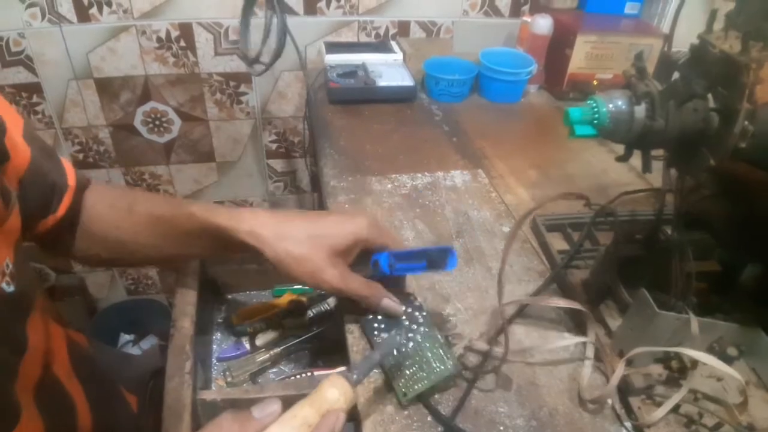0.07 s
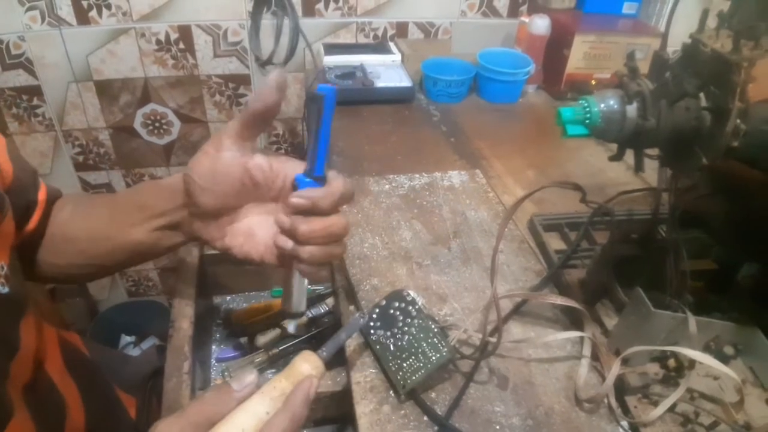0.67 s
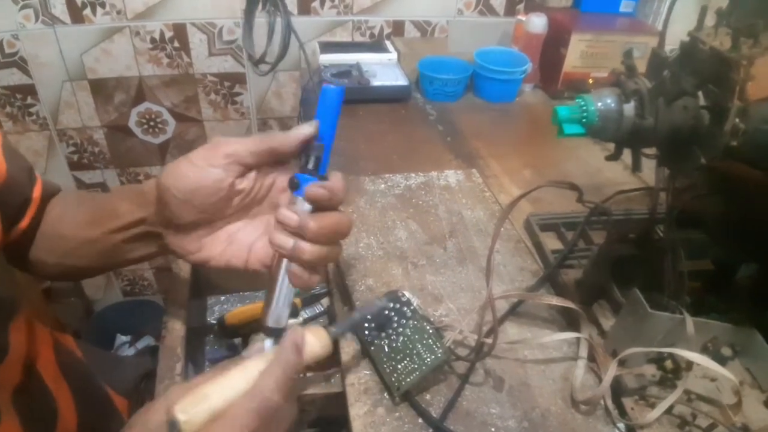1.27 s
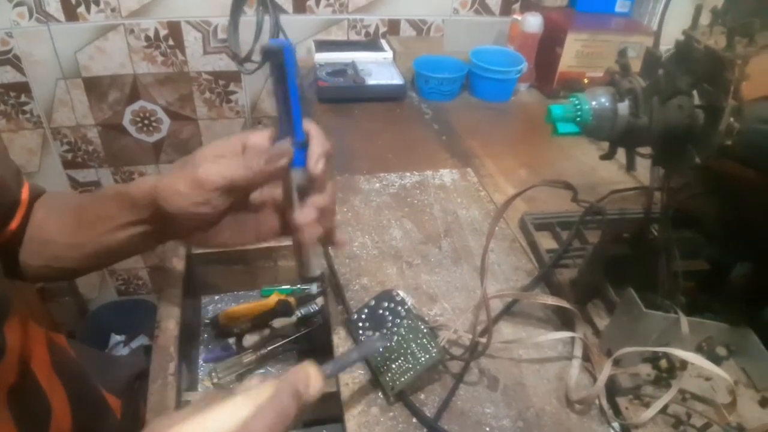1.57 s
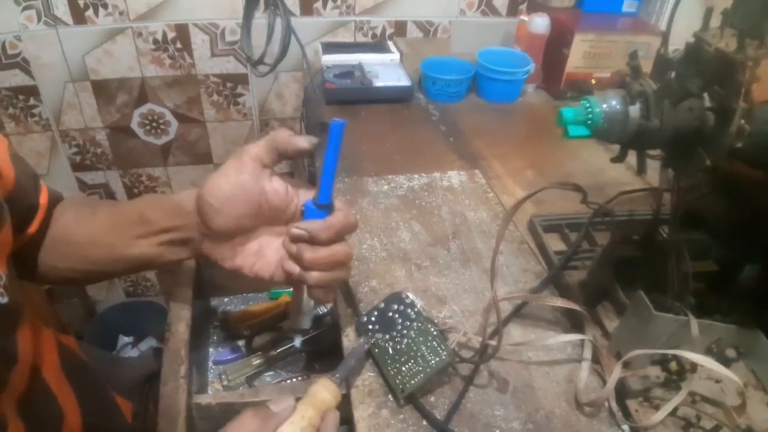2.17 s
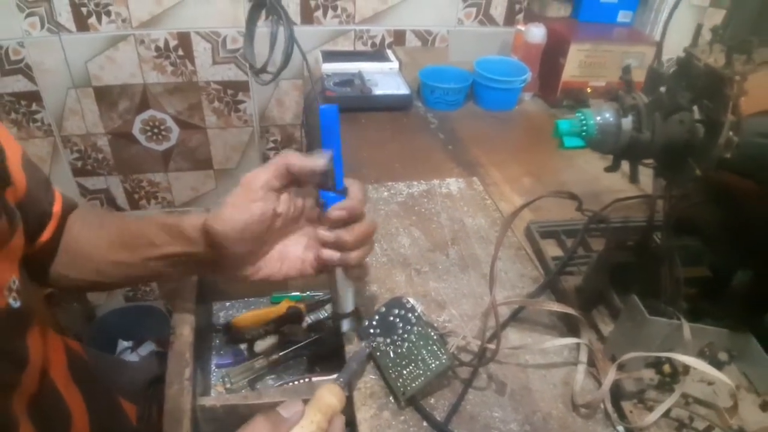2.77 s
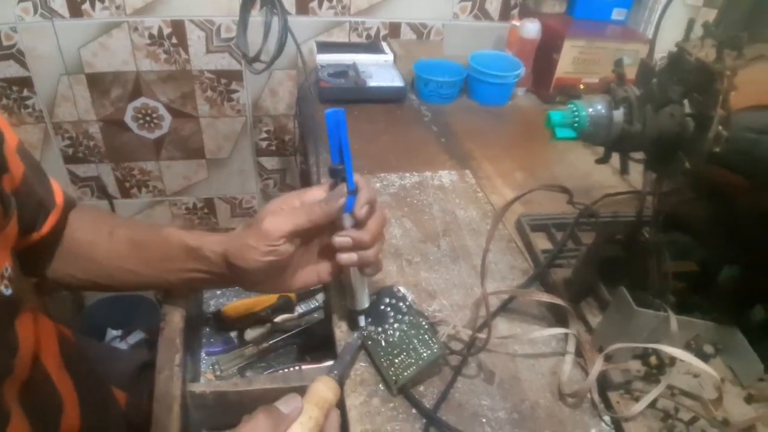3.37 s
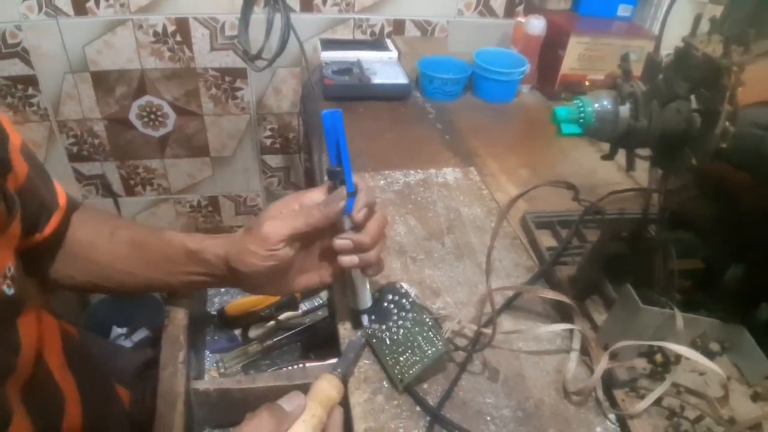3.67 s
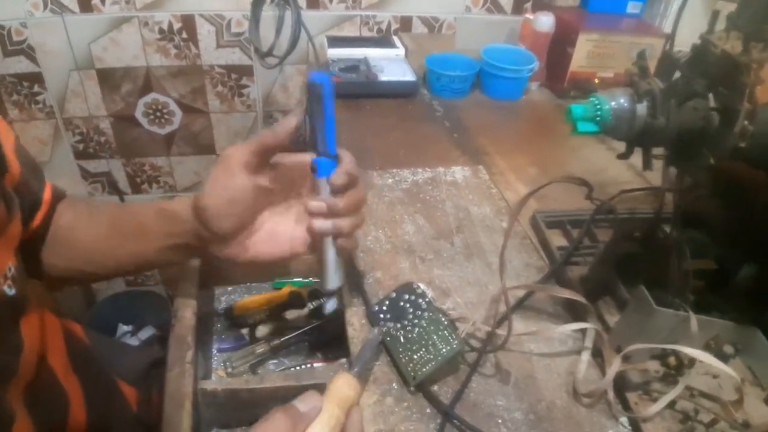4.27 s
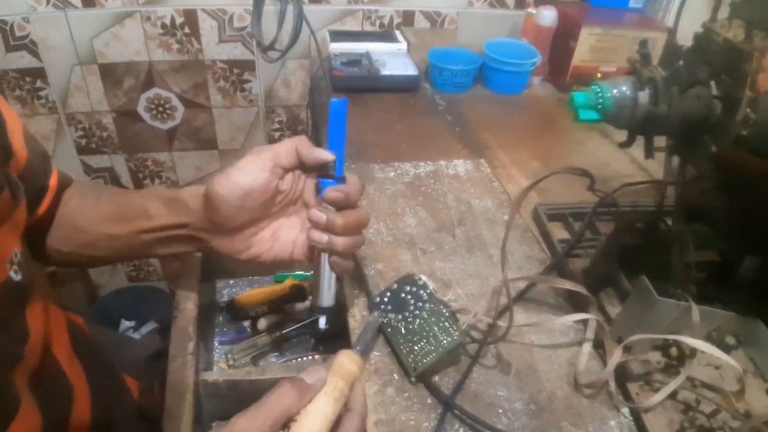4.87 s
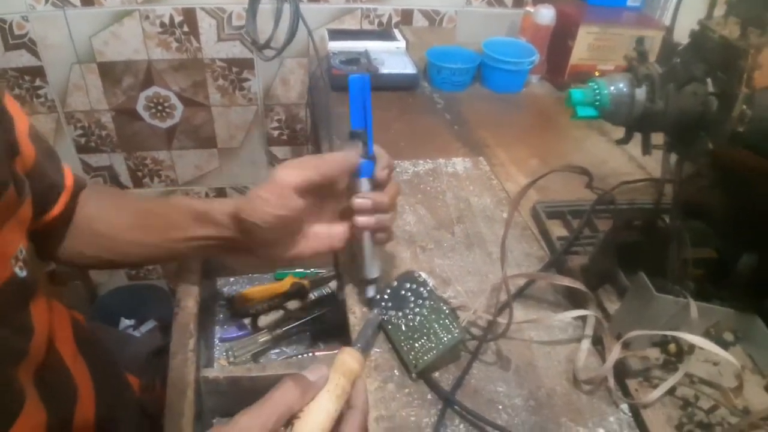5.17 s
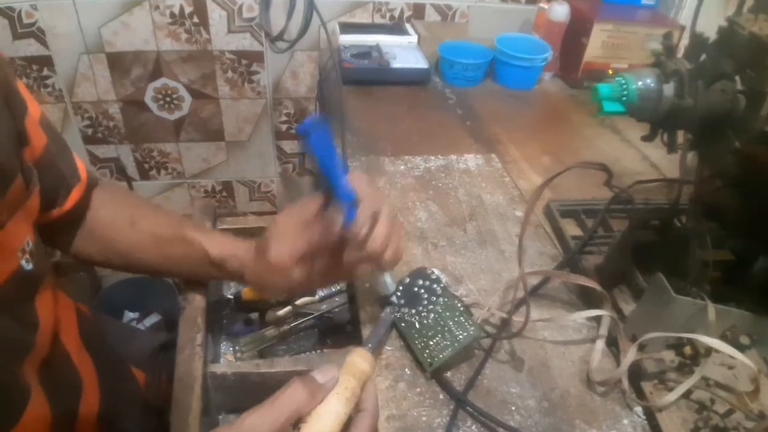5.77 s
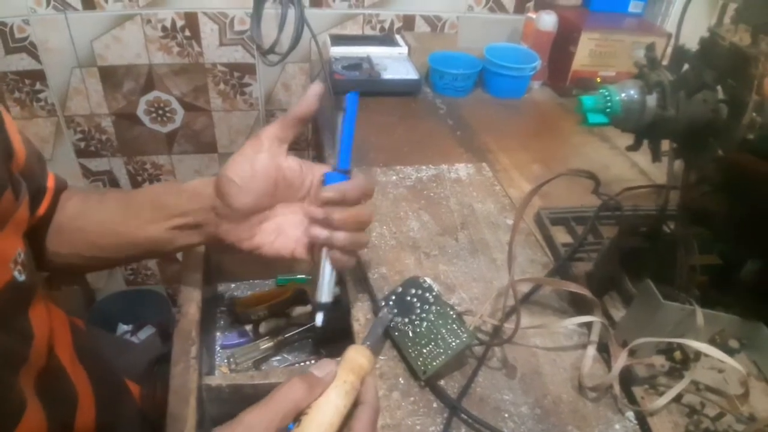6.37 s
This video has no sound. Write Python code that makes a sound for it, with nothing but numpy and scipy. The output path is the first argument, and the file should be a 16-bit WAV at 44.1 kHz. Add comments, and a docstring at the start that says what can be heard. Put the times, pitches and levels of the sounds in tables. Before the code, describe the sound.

A spring-loaded desoldering pump is worked close to a phone microphone in a small tiled workshop. Soft hand knocks come first, then the plunger slides down with a faint squeak and latches with a hard plastic clack. The slider taps back, and after a pause the trigger snaps and the spring rings briefly. It fires three times in all, each with a short bright echo, and a fresh stroke squeaks at the end.

```python
"""A spring-loaded desoldering pump is worked over a circuit board in a small tiled workshop, near a phone.
Hands knock and rustle over a faint hum, which stops as the plunger first slides down on its squeaking
seal. It latches with a hard plastic clack, the slider runs back and the hand holds still to aim.
The trigger snaps; the piston rushes up the barrel, hits its stop and leaves the spring ringing.
The pump fires near 1.5, 3.9 and 5.8 s, and a fresh stroke is just squeaking at the end."""
import sys
import numpy as np
from scipy import signal
from scipy.fft import rfft, irfft, next_fast_len
from scipy.io import wavfile
from scipy.ndimage import uniform_filter1d

SR = 44100
rng = np.random.default_rng(int(sys.argv[2]) if len(sys.argv) > 2 else 0)


def wav_record(signal):
    """Record a signal, one row per channel, as 16-bit PCM in the file named by sys.argv[1]."""
    frames = np.transpose(np.atleast_2d(signal))
    bounded = np.clip(frames, -1, 1)
    # unit amplitude maps onto the largest positive 16-bit level
    quanta = np.round(bounded * 32767).astype(np.int16)
    wavfile.write(sys.argv[1], SR, quanta)


N = 287524
T = np.arange(N) / SR
BLOW_SIZE = 8192
BLOW_HZ = np.fft.rfftfreq(BLOW_SIZE, 1 / SR)

# plunger strokes: start_s, end_s, thumb_db, rub_db, squeak_s, swell_s, low_squeak_db, high_squeak_db
STROKES = [(0.794, .981, -47, -47, .83, 0.0073, -49, -58.5),
           (2.0688, 2.125, -54, -66, 2.1, 0.0073, -84, -90),
           (2.414, 2.561, -58, -50, 2.482, 0.025, -52, -53),
           (4.591, 4.76, -51, -47, 4.616, .008, -38, -67.5),
           (6.4621, 6.63, -49, -43, 6.505, 0.01, -36.5, -51)]
# latch clacks: start_s, level_db, tilt_db_per_octave, t60_s, barrel_hz, barrel_db
LATCHES = [(0.9846, -8.5, -0.07, 0.0065, 3600, 5.5), (2.1344, -17.5, -3, 0.015, 2750, 9.5),
           (2.5696, -9.5, 0, .014, 7300, 5.5), (4.7728, -9, -0.23, .014, 2400, 2.5)]
# the slider hitting its stop: start_s, level_db, body_db, treble_db
RETURNS = [(1.2591, -27, 6.5, 0), (2.774, -31, -4.5, -5.5), (4.9936, -28.5, -6, -11.5)]
# trigger snaps: start_s, level_db, treble_db, t60_s
TRIGGERS = [(1.4472, -28, 19, 0.035), (3.914, -19.5, -1, 0.02), (5.771, -40.5, -0.5, 0.074)]
# piston shots: fastest_s, swell_s, rush_db, ring_db, ring_tilt_db_per_octave, even_modes_db
FIRINGS = [(1.459, 0.0064, -30.5, -34, -22.5, 10), (3.928, 0.0049, -28.5, -20.5, 2, -1.5),
           (5.807, 0.0089, -32, -33.5, 6.5, -9.5)]
# spectra of knocked plastic, rubbed plastic and the moving hand: frequency_hz, level_db
KNOCK_COLOUR = [(30, -39.5), (75, -22), (150, -6), (290, 0), (600, -2.5), (1200, -4.5), (2000, -2),
                (3000, 1.5), (4500, 2), (8000, -12), (16000, -11.5)]
RUB_COLOUR = [(100, -6), (300, 0.5), (700, -3.5), (1400, -6), (2500, -0.5), (4000, 5), (5500, -0.5),
              (8000, -3.5), (11000, -5.5), (16000, -11)]
HANDLING_COLOUR = [(40, -20.5), (90, -0.5), (160, 5.5), (280, -3), (450, -15.5), (1000, -24), (3000, -23.5),
                   (8000, -40), (16000, -41.5)]


def undb(db):
    """Decibels to gain."""
    return 10 ** (np.asarray(db) / 20)


def unit(x):
    """Scale to rms 1."""
    return x / np.sqrt(np.mean(x ** 2))


def gains(points, hz):
    """Gain at hz of (frequency_hz, level_db) points joined on a log axis."""
    f, db = np.transpose(points)
    return undb(np.interp(np.log(hz + 1), np.log(f), db))


def tint(x, points):
    """Give a sound the colour of (frequency_hz, level_db) points, rms 1."""
    size = next_fast_len(N, real=True)
    spectrum = rfft(x, size) * gains(points, np.fft.rfftfreq(size, 1 / SR))
    return unit(irfft(spectrum, size)[:N])


def noise(points):
    """Noise of a given colour, rms 1."""
    return tint(rng.standard_normal(N), points)


def walk(rate):
    """A random wander with a spread near 1 and `rate` turns a second."""
    knots = rng.standard_normal(int(N / SR * rate) + 2)
    return np.interp(T * rate, np.arange(len(knots)), knots)


def fade(t, t60):
    """Exponential decay."""
    return np.exp(-np.log(1000) * t / t60)


def swell(s, width):
    """A bell-shaped rise and fall around time s."""
    bell, near = np.zeros(N), abs(T - s) < 10 * width
    bell[near] = np.exp(-((T[near] - s) / width) ** 2 / 2)
    return bell


def add(track, s, sound):
    """Mix a sound in at time s."""
    i = max(int(s * SR), 0)
    track[i:i + len(sound)] += sound[:N - i]


def resonate(x, hz, t60):
    """One damped mode, with unit gain for noise power."""
    t = T[:int(t60 * SR)]
    ring = fade(t, t60) * np.sin(2 * np.pi * hz * t)
    return signal.oaconvolve(x, ring / np.linalg.norm(ring))[:N]


def hump(hz, db, octaves=0.23):
    """Gain of one broad resonance."""
    return undb(db / (1 + (np.log2((BLOW_HZ + 1) / hz) / octaves) ** 2))


def blow(colour, t60, energy_s=.005):
    """A burst of dense, quickly damped plastic modes, with the energy of rms 1 held for energy_s."""
    cepstrum = irfft(np.log(colour))  # folded to minimum phase, so the attack stays sharp
    cepstrum[1:BLOW_SIZE // 2] *= 2
    cepstrum[BLOW_SIZE // 2:] = 0
    decay = fade(T[:BLOW_SIZE], 2 * t60)
    burst = rfft(rng.standard_normal(BLOW_SIZE) * decay)
    flat = irfft(burst / abs(burst)) * decay  # a hard contact feeds all frequencies alike
    hit = irfft(rfft(flat) * np.exp(rfft(cepstrum)))
    return hit / np.linalg.norm(hit) * np.sqrt(energy_s * SR)


def strike(db, body_db, treble_db, t60, hz, body_hz=1100, treble_hz=4800):
    """Heavy contacts carry more body, hard ones more treble; the place struck picks the resonance."""
    low = 1 / (1 + (BLOW_HZ / body_hz) ** 2)
    high = 1 - 1 / (1 + (BLOW_HZ / treble_hz) ** 4)
    colour = gains(KNOCK_COLOUR, BLOW_HZ) * undb(body_db * low + treble_db * high) * hump(hz, db=8)
    return undb(db) * blow(colour, t60)


def echo(build_s=0.0022, shared_hz=500, patchy_db=3):
    """The short, bright, dense stereo echo of tiles and bench for one place of the pump."""
    # reverb bands: centre_hz, t60_s, level_db
    bands = [(100, .45, -6.5), (300, 0.64, -1.5), (750, 0.28, 2.5), (1940, 0.31, -3), (3480, 0.34, -8),
             (7100, 0.33, 2.5), (11000, 0.31, -1.5), (16000, 0.16, -3.5)]
    t = T[:SR * 2 // 3]
    hz = np.fft.rfftfreq(len(t), 1 / SR)
    centres = np.log([row[0] for row in bands])
    common, *own = rfft(rng.standard_normal((3, len(t))) * undb(patchy_db * walk(1500)[:len(t)]))
    alike = 1 / (1 + (hz / shared_hz) ** 2)  # long waves reach both microphones in step
    field = np.sqrt(alike) * common + np.sqrt(1 - alike) * np.array(own)
    out = 0
    for share, (_, t60, db) in zip(np.eye(len(bands)), bands):
        envelope = fade(t, t60) * (1 - np.exp(-(t / build_s) ** 2))
        band = irfft(field * np.interp(np.log(hz + 1), centres, share), len(t))
        out = out + undb(db) * band * envelope / np.linalg.norm(envelope)
    return out


def workshop(x, shadow_hz=450, pan_db=9, lag_s=.00011, send_db=-1.27, lowered_db=-2, places=12):
    """The pump is heard from the left; its echo shifts as it moves and dries up down at the board."""
    bass = signal.sosfilt(signal.butter(1, shadow_hz, fs=SR, output="sos"), x)  # bends round the phone
    left, right = (bass + (x - bass) * undb(side * pan_db / 2) for side in (1, -1))
    out = np.array([left, np.pad(right, (round(lag_s * SR), 0))[:N]])
    lowered = sum(swell(s, .25) for s, *_ in FIRINGS)
    send = x * undb(send_db + lowered_db * lowered)
    for place in np.eye(places):
        share = np.sqrt(np.interp(T, np.linspace(0, T[-1], places), place))
        near = np.flatnonzero(share)
        for channel, response in zip(out, echo()):
            add(channel, T[near[0]], signal.fftconvolve((send * share)[near], response))
    return out


def handling_level(moving_db=-68, still_db=-77.5, settle_s=.15, regrip_db=-69.5, regrip_lag_s=.25):
    """The thumb shifts after each latching; the hand holds still from slider return to firing."""
    aiming = sum((T > back[0]) & (T < shot[0]) for back, shot in zip(RETURNS, FIRINGS))
    moving = 1 - uniform_filter1d(aiming.astype(float), int(settle_s * SR))
    first_latch_db = LATCHES[0][1]
    regrip = sum(swell(s + regrip_lag_s, .18) * undb(db - first_latch_db) for s, db, *_ in LATCHES)
    return undb(still_db + (moving_db - still_db) * moving) + undb(regrip_db) * regrip


def background(air_db=-76.5, rumble_db=-80.5, jolt_db=-40.5, side_db=-8,
               hum_hz=48.1, hum_db=-72.5, hum_end_s=.93):
    """Faint hiss, soft hand and sleeve, a rumble as each firing jolts the arm, and a hum that stops."""
    # spectra of room tone and low rumble: frequency_hz, level_db
    air_colour = [(59, -42), (100, -13.5), (202, -16), (373, -36), (442, -16.5), (721, -25), (1100, -29.5),
                  (2690, -31), (16000, -30.5)]
    rumble_colour = [(20, -13), (35, -9), (48, -1.5), (70, -5.5), (140, -20), (400, -61.5)]
    out = np.array([noise(air_colour), noise(air_colour)]) * undb(air_db)
    rumble = undb(rumble_db) + sum(undb(db + jolt_db) * swell(s, .076) for s, _, db, *_ in FIRINGS)
    for level, colour in (handling_level(), HANDLING_COLOUR), (rumble, rumble_colour):
        waver = undb(.5 * walk(30))
        mid, side = noise(colour), undb(side_db) * noise(colour)
        out += level * waver * np.array([mid + side, mid - side])
    hum_gate = np.clip((hum_end_s - T) / .15, 0, 1)
    return out + undb(hum_db) * hum_gate * np.sin(2 * np.pi * hum_hz * T)


def hand(recoil_db=-20, recoil_s=.01):
    """Dull bumps, recoil and thuds of hand and arm, and skin squeaking on the plastic."""
    # soft bumps: peak_s, swell_s, level_db
    bumps = [(0.054, 0.045, -50.5), (.15, 0.024, -54), (.28, 0.0049, -48), (2.25, .028, -56.5),
             (3.14, .04, -67), (3.555, 0.02, -51), (4.01, 0.078, -50), (4.68, 0.063, -61),
             (5.46, 0.019, -62), (5.53, 0.01, -56.5), (5.83, 0.059, -50.5)]
    # deep thud of the jolted arm: start_s, pitch_hz, level_db, t60_s
    thuds = [(2.574, 84.86, -44, 0.073)]
    # grip squeaks: peak_s, swell_s, pitch_hz, level_db
    chirps = [(5.730, 0.0026, 1920, -59), (6.237, 0.0033, 2110, -69), (6.418, 0.002, 2995, -61.5)]
    recoil = sum(undb(db + recoil_db) * swell(s, recoil_s) for s, _, db, *_ in FIRINGS)
    bumping = sum(undb(db) * swell(s, width) for s, width, db in bumps)
    out = (recoil + bumping) * noise(HANDLING_COLOUR)
    for s, hz, db, t60 in thuds:
        add(out, s, undb(db) * fade(T[:SR], t60) * np.sin(2 * np.pi * hz * T[:SR]))
    for s, width, hz, db in chirps:
        out += undb(db) * swell(s, width) * np.sin(2 * np.pi * hz * T)
    return out


def scrapes(slide_db=-47.5, lead_s=.007, catch_db=-10.5, hollow_db=1, hollow_hz=1100):
    """The slider scrapes home along the hollow barrel, the catch slips off its edge, fingers rustle."""
    # fingers on the barrel: peak_s, swell_s, level_db
    rustles = [(0.069, 0.058, -63), (3.13, 0.026, -79), (3.175, 0.0051, -66), (3.572, 0.026, -75)]
    rub = noise(RUB_COLOUR) * undb(2 * walk(300))
    hollow = unit(signal.sosfilt(signal.butter(2, hollow_hz, fs=SR, output="sos"), noise(KNOCK_COLOUR)))
    slider = undb(slide_db) * sum(swell(s - lead_s, .0076) for s, *_ in RETURNS)
    catch = sum(undb(db + catch_db) * swell(s, .0029) for s, db, *_ in TRIGGERS)
    fingers = sum(undb(db) * swell(s, width) for s, width, db in rustles)
    return (slider + catch + fingers) * rub + slider * undb(hollow_db) * hollow


def knocks(grip_hz=3230, treble_db_per_octave=70.5):
    """The thumb meets the plunger, the slider returns, the trigger snaps, the pump is knocked about."""
    # stray knocks of fingers, slider and nozzle: start_s, level_db, body_db, treble_db, t60_s
    stray_knocks = [(.014, -41.5, 8, -15, 0.044), (0.0255, -34.5, 4.5, -18, 0.018),
                    (0.0502, -28, -4, -14.5, 0.013), (0.1123, -41, 6, -29, 0.016),
                    (.118, -36.5, 3.5, -29, 0.022), (0.275, -50, -20, -1, 0.037),
                    (.3443, -53.5, 14, 3.5, 0.049), (0.4542, -38.5, -28, -12, 0.03),
                    (0.9449, -40, 3.5, -8, 0.0094), (1.2025, -38.5, -13.5, 8, .02),
                    (1.2213, -35, -1, 14.5, 0.028), (1.5101, -38, 4.5, -11, 0.024),
                    (1.5512, -40, -12.5, -46, 0.062), (1.6591, -45, -16, -40, 0.061),
                    (2.1283, -39, 2, -3, 0.053), (2.526, -44, 5, -11.5, 0.0082),
                    (3.5433, -53.5, -2, -23, .06), (3.8822, -42.5, 10.5, -16.5, 0.12),
                    (3.9198, -22.5, 9, -3, 0.0098), (3.937, -22, 2.5, -27, 0.023),
                    (4.031, -33, 8, -8, 0.0099), (4.04, -39.5, 14, -17.5, 0.045),
                    (4.087, -35.5, 0, 12, 0.022), (4.696, -35, 3, 9.5, 0.013),
                    (4.714, -36.5, 3.5, -9, 0.037), (5.0162, -26.5, -8.5, 5, 0.013),
                    (5.212, -63.5, -25, -31, .02), (5.4436, -63.5, -3.5, -10.5, .03),
                    (5.7796, -28.5, 7.5, 5.5, 0.042), (5.8698, -36.5, 12, -14, 0.03),
                    (5.884, -37, 11, 3.5, 0.036)]
    out = np.zeros(N)
    for s, _, db, *_ in STROKES:
        add(out, s, strike(db, body_db=-4, treble_db=4, t60=.018, hz=2620))
    for s, db, body_db, treble_db in RETURNS:
        add(out, s, strike(db, body_db, treble_db, t60=.013, hz=506))
    for s, db, treble_db, t60 in TRIGGERS:
        add(out, s, strike(db, body_db=-5, treble_db=treble_db, t60=t60, hz=2400))
    for s, db, body_db, treble_db, t60 in stray_knocks:
        hz = grip_hz * 2 ** (treble_db / treble_db_per_octave)  # harder knocks ring higher
        add(out, s, strike(db, body_db, treble_db, t60, hz))
    return out


def grit(slips_per_s=700, spread_db=1.5, smooth_db=-4):
    """Tiny slips of uneven size over a smooth hiss, rms 1."""
    slips = (rng.random(N) < slips_per_s / SR) * rng.choice([-1, 1], N)
    sizes = undb(spread_db * np.minimum(rng.exponential(size=N), 4))
    return unit(tint(slips * sizes, RUB_COLOUR) + undb(smooth_db) * noise(RUB_COLOUR))


def strokes(singing_db=-62.5, flutter_db=3, bend_hz=25, edge_s=.008,
            ramp_lead_s=.084, ramp_rise_s=.018, ramp_db=8.5):
    """The seal sticks and slips in two tones that drift apart; the catch scrapes up its ramp at the end."""
    # seal tones: pitch_hz, wobble_hz, level_db, glide_fraction_per_s
    seal_tones = [(2700, 85, -1, -0.59), (5290, 170, 0.5, 0.26)]
    rub = unit(grit() * undb(2 * walk(90)))
    out = np.zeros(N)
    for start, end, _, rub_db, squeak_s, width, *squeak_dbs in STROKES:
        gate = np.interp(T, [start, start + edge_s, end, end + edge_s], [0, 1, 1, 0])
        pushed_s = np.clip(T - start, 0, end - start)
        before_ramp = (1 - np.tanh((T - end + ramp_lead_s) / ramp_rise_s)) / 2
        out += gate * rub * undb(rub_db - ramp_db * before_ramp)
        sticking = swell(squeak_s, width)
        for (hz, wobble_hz, db, glide), squeak_db in zip(seal_tones, squeak_dbs):
            pitch = hz * (1 + glide * pushed_s) + wobble_hz * walk(900) + bend_hz * walk(50)
            level = gate * (undb(singing_db) + undb(squeak_db) * sticking)
            out += level * undb(db + flutter_db * walk(150)) * np.sin(2 * np.pi * np.cumsum(pitch) / SR)
    return out


def latches(tip_db=-6, seat_s=.0006, chatter_db=-11, chatter_t60=0.08):
    """The catch tips over its edge, seats a moment later, and the loaded spring chatters in the barrel."""
    # spectrum of the clack: frequency_hz, level_db
    clack_colour = [(80, -21.5), (250, -25), (600, -16), (1200, -19), (2200, -3), (3000, 0), (3600, 0),
                    (4700, 3), (6200, -7), (7600, -5.5), (10000, -10), (13000, -8), (16000, -18.5)]
    out = np.zeros(N)
    for s, db, tilt_db, t60, barrel_hz, barrel_db in LATCHES:
        tilt = undb(tilt_db * np.log2((BLOW_HZ + 500) / 4000))
        colour = gains(clack_colour, BLOW_HZ) * tilt * hump(barrel_hz, barrel_db)
        add(out, s, undb(db + tip_db) * blow(colour, t60 / 2))
        add(out, s + seat_s, undb(db) * blow(colour, t60))
        add(out, s + seat_s, undb(db + chatter_db) * blow(colour, chatter_t60))
    return out


def firings(spring_hz=3245, pressed_t60=.022, grain_db=3, free_db=-9, shake_db=3):
    """The piston rushes up and scrapes the spring: broad modes while pressed, then a thin, shaking ring."""
    # spectrum of the rush: frequency_hz, level_db
    rush_colour = [(70, -16.5), (160, 6.5), (300, 3), (700, -18), (1500, -38), (3000, 15.5), (5000, 8),
                   (8500, 5), (11500, 9.5), (16000, -1)]
    # lengthwise spring modes, lowest first: level_db, free_t60_s
    spring_modes = [(0.5, 0.33), (-11, 0.14), (-17.5, 0.19), (-14, .15)]
    # the lowest mode is a close cluster while pressed: pitch_hz, level_db
    cluster = [(3155, -3), (3245, 1), (3415, -10.5)]
    out = np.zeros(N)
    rush = unit(noise(rush_colour) * undb(grain_db * walk(900)))
    for s, width, rush_db, ring_db, tilt_db, even_db in FIRINGS:
        speed = swell(s, width)
        out += undb(rush_db) * speed * rush
        for k, (db, free_t60) in enumerate(spring_modes, 1):
            mode_db = ring_db + db + tilt_db * np.log2(k) + even_db * (k % 2 == 0)
            strength = undb(mode_db) * np.linalg.norm(speed)
            parts = cluster if k == 1 else [(k * spring_hz, 0)]
            pressed = [(hz, pressed_t60, part_db) for hz, part_db in parts]
            for hz, t60, part_db in pressed + [(k * spring_hz, free_t60, free_db)]:
                ring = resonate(speed * rng.standard_normal(N), hz, t60) * undb(shake_db * walk(120))
                out += strength * undb(part_db) * ring / np.linalg.norm(ring)
    return out


def scene():
    """The pump in the workshop over its quiet background."""
    pump = undb(-6) * latches() + undb(-1) * knocks() + scrapes() + firings() + strokes() + hand()
    return workshop(pump) + background()


def record(dry):
    """The phone drops the deepest bass, rounds the highest peaks and cuts the top."""
    thin = signal.sosfilt(signal.butter(3, 36, "high", fs=SR, output="sos"), dry)
    rounded = .8 * np.tanh(thin / .8)
    return signal.sosfilt(signal.ellip(10, .2, 70, 16100, fs=SR, output="sos"), rounded)


dry = scene()
out = record(dry)
wav_record(out)
```